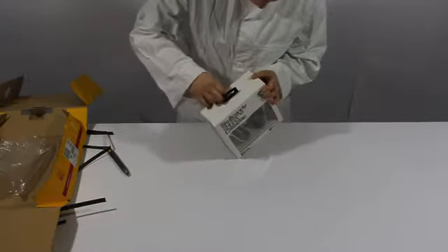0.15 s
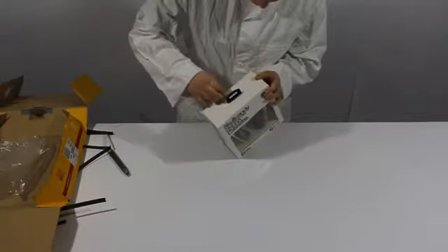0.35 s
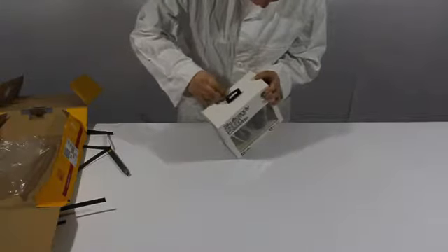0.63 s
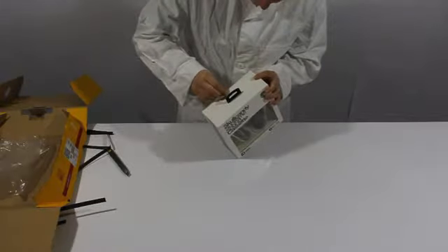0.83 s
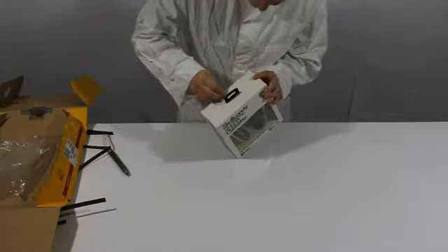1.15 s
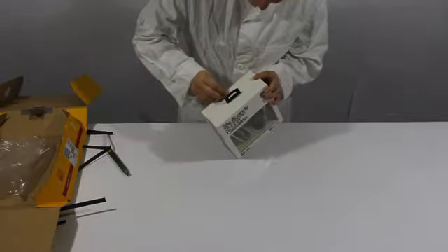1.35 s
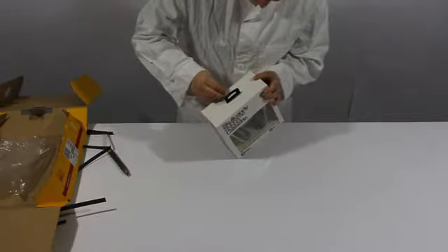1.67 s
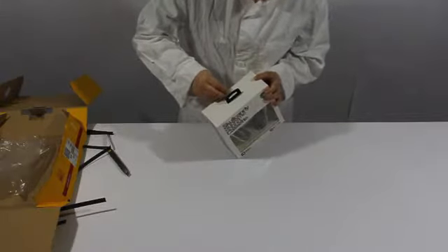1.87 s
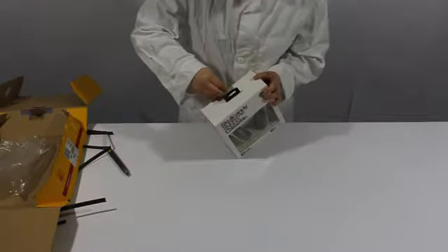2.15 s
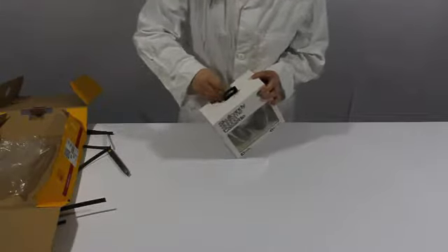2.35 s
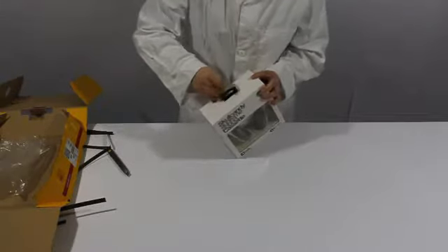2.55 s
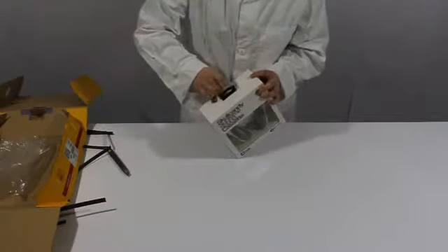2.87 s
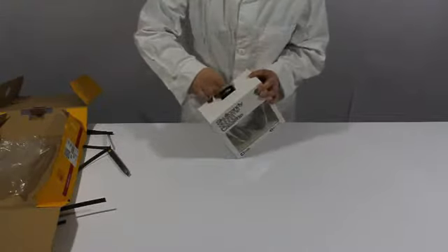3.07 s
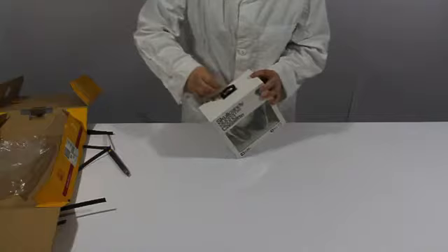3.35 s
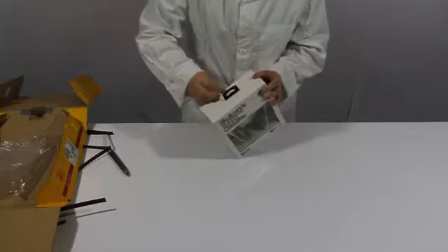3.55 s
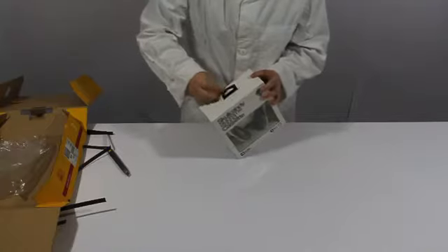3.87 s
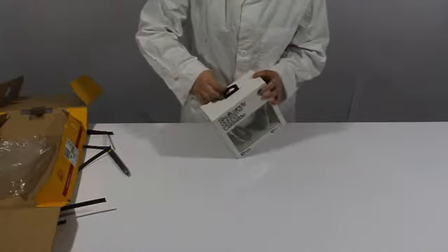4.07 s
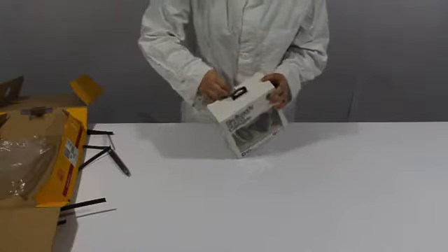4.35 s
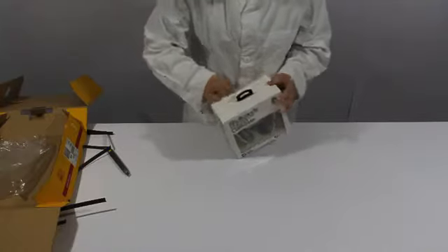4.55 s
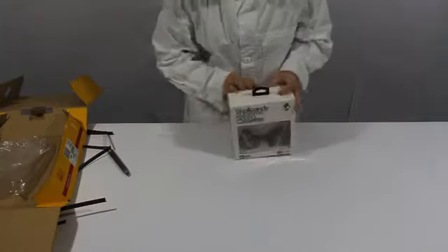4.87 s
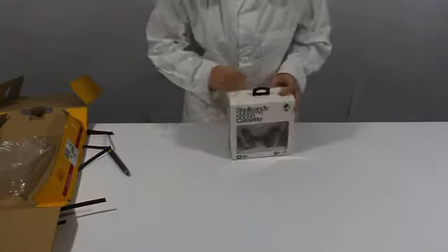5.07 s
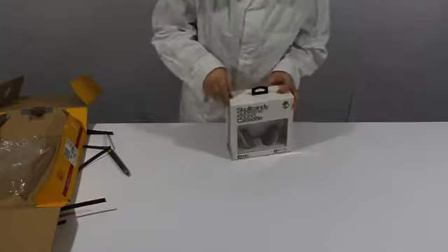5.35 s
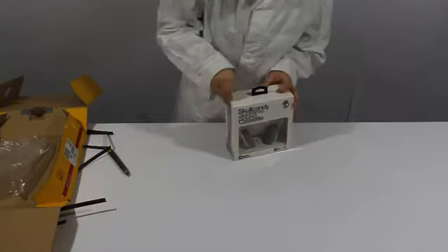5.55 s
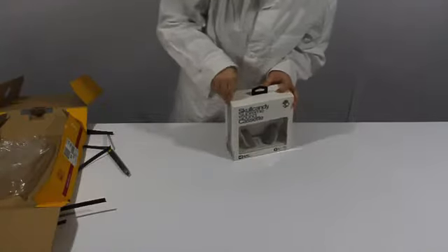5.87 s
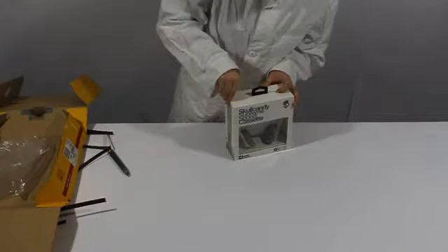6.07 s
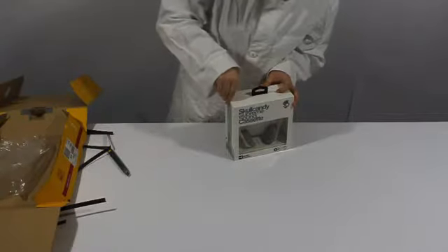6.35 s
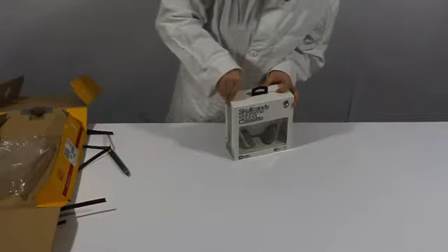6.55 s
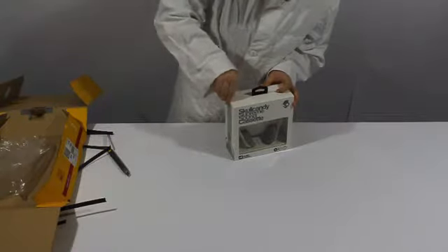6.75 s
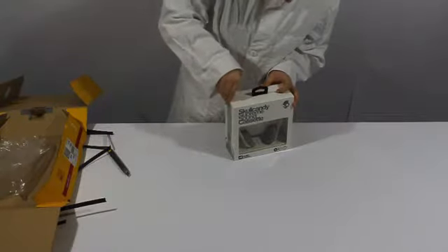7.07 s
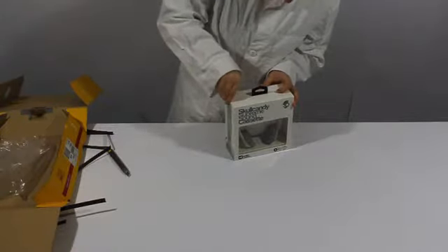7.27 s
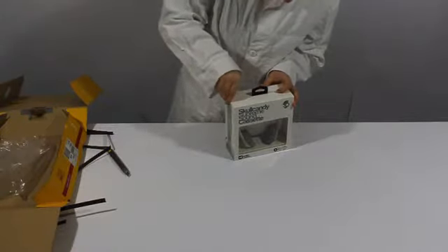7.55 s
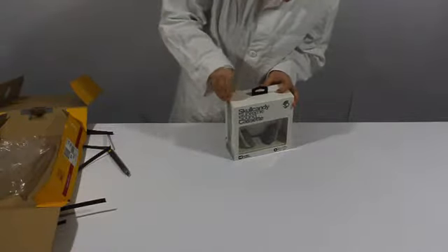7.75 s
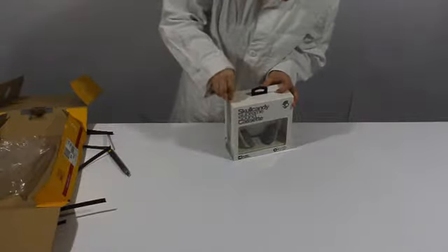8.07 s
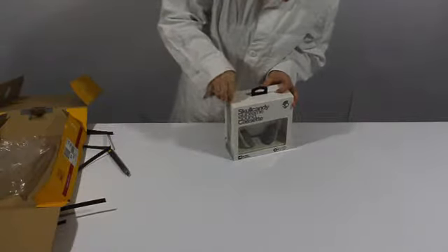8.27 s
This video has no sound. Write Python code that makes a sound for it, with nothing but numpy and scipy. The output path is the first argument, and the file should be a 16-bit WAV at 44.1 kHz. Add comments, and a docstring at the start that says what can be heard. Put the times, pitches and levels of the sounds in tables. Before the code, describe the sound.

Faint room air, soft hiss and a barely audible wavering hum run throughout a bare room with about a second of echo. Light handling rub and two soft taps come in the first 0.6 s. Hard, crisp snaps of plastic against hollow cardboard strike at 1.0, 1.5 and 2.0 s, the first two brighter, the third duller. Small ticks and faint scratches lead to a weaker, very bright snap at 3.2 s. From 3.9 s hands rub the card; a tiny squeak falls in pitch around 4.2 to 4.4 s, ending in another strong snap. Between 4.75 and 5.05 s the box rocks upright with clustered taps, ticks and soft table booms, then shuffles and is nudged at 5.5 s. Hollow knocks come at 6.1 and 6.3 s, the loudest snap at 6.6 s, a dull thud at 7.2 s, and weaker taps at 7.6 and 7.9 s before the echo fades by 8.4 s.

```python
"""Fingernails slip off the plastic seals of a small cardboard box: each edge snaps back and rings wall, flap and card.
Between snaps come light ticks, dull taps, scratches, rubbing and one thin falling squeak of peeling glue.
Midway the box is turned upright, rocks down on the table and is nudged across it.
Blows and friction drive banks of resonances; a bare, echoing room answers over faint air, hum and hiss."""
import sys
import numpy as np
from scipy import signal
from scipy.fft import rfft, irfft
from scipy.io import wavfile

SR = 44100
rng = np.random.default_rng(int(sys.argv[2]) if len(sys.argv) > 2 else 0)


def transcribe(signal):
    """Save signal, clipped to [-1, 1], as a 16-bit WAV file at the path in sys.argv[1]."""
    frames = np.atleast_2d(signal).T
    limited = np.clip(frames, -1, 1)
    pcm = np.round(limited * 32767).astype(np.int16)
    wavfile.write(sys.argv[1], SR, pcm)


N = 371322
HIT_SAMPLES = 4096


def from_db(db):
    """Amplitude ratio of a level in dB."""
    return 10 ** (np.asarray(db) / 20)


def rms_one(x):
    """Scales a sound to an RMS of 1."""
    return x / np.sqrt(np.mean(x ** 2) + 1e-20)


def in_time(rows):
    """The columns of a curve, sample by sample."""
    s, *columns = np.transpose(rows)
    return [np.interp(np.arange(N) / SR, s, column) for column in columns]


def at_hz(points, hz):
    """Reads a spectrum on a log-frequency axis."""
    known_hz, values = np.transpose(points)
    return np.interp(np.log(np.maximum(hz, 1)), np.log(known_hz), values)


def drift(knots_per_s):
    """Random curve: straight lines between normal knots of spread 1."""
    knots = rng.standard_normal(4096)
    return np.interp(np.arange(N) / SR * knots_per_s, np.arange(len(knots)), knots)


def strokes(rows, edge_s):
    """Gain that rises, holds and falls for each (start s, length s, level dB)."""
    t = np.arange(N) / SR
    gain = 0
    for start, length, db in rows:
        to_nearest_end = np.minimum(t - start, start + length - t)
        gain = gain + from_db(db) * np.clip(to_nearest_end / edge_s + .5, 0, 1)
    return gain


def filtered(x, cutoff_hz, kind="low"):
    """Second-order Butterworth filter."""
    return signal.sosfilt(signal.butter(2, cutoff_hz, kind, fs=SR, output="sos"), x)


def sine(hz):
    """Sine that follows a pitch curve."""
    return np.sin(2 * np.pi * np.cumsum(hz) / SR)


def resonate(force, modes):
    """A force through parallel resonances, each (Hz, width Hz, dB)."""
    out = 0
    for hz, width, db in modes:
        r = np.exp(-np.pi * width / SR)
        poles = [1, -2 * r * np.cos(2 * np.pi * hz / SR), r * r]
        zeros = [(1 - r * r) / 2, 0, (r * r - 1) / 2]
        out = out + from_db(db) * signal.lfilter(zeros, poles, force + 1e-18)
    return out


def strike(force, modes, db):
    """The ring of one blow; dB is its energy spread over 10 ms."""
    ring = resonate(force, modes)
    return from_db(db) * ring * np.sqrt(.01 * SR / np.sum(ring ** 2))


def slip(catch_s, count=4):
    """Force of a nail letting go: tiny catches smear one pulse in time but leave its spectrum flat."""
    force = signal.unit_impulse(HIT_SAMPLES)
    for k, chance in enumerate(rng.uniform(.7, 1.3, count)):
        lag = max(round(chance * catch_s * SR / 2 ** k), 1)
        allpass = np.r_[1, np.zeros(lag - 1), .65 * (-1) ** k]
        force = signal.lfilter(allpass[::-1], allpass, force)
    return force


def friction(slips_per_s, uneven_db):
    """Dense small slips of random size, made stronger and weaker by the changing pressure."""
    slips = (rng.random(N) < slips_per_s / SR) * rng.standard_normal(N)
    return slips * from_db(uneven_db * np.tanh(drift(knots_per_s=90)))


def add(track, s, sound):
    """Lays a sound into a track at a time."""
    start = max(round(s * SR), 0)
    part = track[start:start + len(sound)]
    part += sound[:len(part)]


# Steady air. Each row: frequency in Hz, relative density in dB per Hz.
AIR_SPECTRUM = [(25, -24), (60, -14.5), (100, -8), (200, -9.5), (330, -11.5), (460, -9.5), (750, -14.5),
                (1200, -12), (2000, -20.5), (4000, -21.5), (8000, -25), (16000, -29)]
# Hum pitch. Each row: time in seconds, pitch in Hz.
HUM_PITCH = [(0, 151.8), (3.7, 150), (4.15, 141.3), (4.7, 140), (5.3, 158), (6.55, 152.2), (7.15, 165),
             (7.65, 163.8), (8.4, 155.7)]
# Hum swells, before the waver. Each row: start in seconds, length in seconds, added level in dB.
HUM_SWELLS = [(4.05, .55, -62), (6.48, .14, -65), (7.08, .3, -66), (7.58, .14, -62.5), (8.24, .2, -62.5)]
# Mid hiss: a broad band around 1.3 kHz. Each row: time in seconds, level in dB.
MID_HISS = [(0, -62), (3.6, -67.5), (4.2, -62), (8.42, -68)]
AIR_DB, HUM_DB = -56, -72
HUM_WAVERS_PER_S = 7


def background(waver_db=4.5, swell_s=0.11):
    """Room air as shaped noise, a hum that wanders in pitch and level, and a broad band of mid hiss."""
    colour = from_db(at_hz(AIR_SPECTRUM, np.fft.rfftfreq(N, 1 / SR)))
    air = from_db(AIR_DB) * rms_one(irfft(rfft(rng.standard_normal(N)) * colour, N))
    waver = from_db(waver_db * drift(HUM_WAVERS_PER_S))
    hum_gain = (from_db(HUM_DB) + strokes(HUM_SWELLS, swell_s)) * waver
    hum = hum_gain * rms_one(sine(in_time(HUM_PITCH)[0]))
    band = [(1280, 1160, 0)]
    mid_noise = resonate(resonate(rng.standard_normal(N), band), band)
    hiss = from_db(in_time(MID_HISS)[0]) * rms_one(mid_noise)
    return air + hum + hiss


# Room decay. Each row: frequency in Hz, t60 in seconds.
ROOM_T60 = [(100, 0.77), (400, 0.83), (1300, 1.02), (2800, 1.23), (5000, 1.16), (8000, 0.8), (14000, 0.48)]
# Room level. Each row: frequency in Hz, tail energy against the direct sound in dB.
ROOM_DB = [(100, -1), (250, 2), (500, 0), (1200, 2.5), (2800, -2.5), (5000, -4), (8000, -8.5),
           (14000, -7.5)]
# Early echoes from the table and the body. Each row: delay in seconds, gain.
ECHOES = [(.0066, 0.19), (0.0109, 0.041)]


def room(near, around, build_s=0.00067):
    """Direct sound, early echoes and a diffuse tail of noise bands, each with its own level and decay."""
    t = np.arange(2 ** 16) / SR
    hz = np.fft.rfftfreq(len(t), 1 / SR)
    white = rfft(rng.standard_normal(len(t)))
    centres = np.geomspace(80, 16000, 20)
    tail = np.zeros(len(t))
    for centre, share in zip(centres, np.eye(len(centres))):
        weight = at_hz(np.column_stack([centres, share]), hz)
        decay = from_db(-60 * t / at_hz(ROOM_T60, centre)) * (1 - np.exp(-t / build_s))
        band = irfft(white * weight) * decay
        unit_energy = np.sqrt(np.mean(weight ** 2) / np.sum(band ** 2))
        tail += from_db(at_hz(ROOM_DB, centre)) * band * unit_energy
    out = near + signal.fftconvolve(around, tail)[:N]
    for delay, gain in ECHOES:
        add(out, delay, gain * near)
    return out


# Modes of the table top. Each row: frequency in Hz, width in Hz, relative level in dB.
TABLE_MODES = [(68, 16, -27), (108, 6.8, 7), (124.5, 4.7, 7)]


def table_boom(db):
    """The table top booms softly under the box."""
    push = filtered(signal.unit_impulse(2 * HIT_SAMPLES), [70, 400], "band")
    return strike(push, TABLE_MODES, db)


# The bottom edge rocks down on the table. Each row: time in seconds, level in dB.
BUMPS = [(4.878, -48), (4.961, -44), (5.035, -49.5), (5.529, -52)]


def bumps():
    """The box settles on the table, which booms at each contact."""
    out = np.zeros(N)
    for s, db in BUMPS:
        add(out, s, table_boom(db))
    return out


# Thump modes of the whole carton. Each row: frequency in Hz, width in Hz, relative level in dB.
THUMP_MODES = [(214, 360, -11), (251.5, 96, 0.5), (302, 26, 3)]
NUDGE_S, NUDGE_RISE_S, NUDGE_LENGTH_S = 5.52, .04, 0.17
NUDGE_DB, NUDGE_FADE_DB_PER_S = -47.5, -28


def nudge(slips_per_s=1400):
    """A quick push that dies away: the bottom edge judders over the table and drives the whole carton."""
    judder = friction(slips_per_s, uneven_db=0)
    dull = filtered(judder, [120, 500], "band")
    carton = rms_one(resonate(dull, THUMP_MODES + [(207, 26, 0)]))
    fade = from_db(NUDGE_FADE_DB_PER_S * np.maximum(np.arange(N) / SR - NUDGE_S, 0))
    return strokes([(NUDGE_S, NUDGE_LENGTH_S, NUDGE_DB)], NUDGE_RISE_S) * fade * carton


# Modes of the lid flap. Each row: multiple of its pitch, width in Hz, relative level in dB.
FLAP_MODES = [(1.002, 187, 10.5), (1.36, 266, 0), (1.72, 254, 3.5)]


def flap_modes(pitch_hz):
    """The fingers stiffen the flap and so set its pitch."""
    return [(pitch_hz * multiple, width, db) for multiple, width, db in FLAP_MODES]


# Crack modes of the stiff card. Each row: frequency in Hz, width in Hz, relative level in dB.
CARD_MODES = [(2060, 840, 1.5), (2760, 680, 9.5), (3710, 910, 6.5), (4800, 1950, -3)]
# Tick modes of the plastic seal. Each row: frequency in Hz, width in Hz, relative level in dB.
SEAL_MODES = [(6430, 2900, 9.5), (9040, 11000, 10), (11400, 1900, 8.5), (12500, 2000, -5)]


def card_and_seal(grains):
    """Friction heard through flap and card (scratch) and through the plastic (hiss)."""
    scratch = rms_one(resonate(grains, flap_modes(1340) + CARD_MODES))
    hiss = rms_one(resonate(grains, SEAL_MODES))
    return scratch, hiss


# The hands shift and turn the box. Each row: start in seconds, length in seconds, effort in dB.
SHIFTS = [(0.167, 0.19, -13), (3.92, 0.5, -12.5), (4.758, 0.12, -6), (4.864, 0.13, 0), (5.11, 0.276, -9),
          (5.382, 0.1, -9), (5.507, 0.146, -7), (5.73, 0.52, -14.5), (6.93, 0.032, -9),
          (7.544, 0.09, -12.5)]
# Harder rubbing is brighter. Each law: level in dB at full effort, growth in dB per dB of effort.
RUMBLE_LAW, SCRATCH_LAW, HISS_LAW = (-48.5, 1), (-47.5, 1.165), (-50.5, 1.9)


def rubs(edge_s=0.026):
    """The hands drive the whole box with friction; one effort sets rumble, scratch and hiss."""
    effort = strokes(SHIFTS, edge_s)
    carton = THUMP_MODES + [(450, 98, 9.5), (210, 38, -9.0)]
    rumble = rms_one(resonate(friction(slips_per_s=2900, uneven_db=4), carton))
    scratch, hiss = card_and_seal(friction(slips_per_s=1100, uneven_db=1.5))
    out = 0
    for (db, growth), sound in zip((RUMBLE_LAW, SCRATCH_LAW, HISS_LAW), (rumble, scratch, hiss)):
        out = out + from_db(db) * effort ** growth * sound
    return out


# Scratches, one soft wash at 2.22 s that lengthens the room tail of the snap before, and a short
# 1.7 kHz ring that belongs to the snap at 6.629 s. Each row: start in seconds, length in seconds,
# level in dB, hiss against that level in dB before hiss_db, rasp pitch in Hz.
SCRATCHES = [(0.177, .16, -69.5, 9.5, 2190), (2.22, 0.29, -59, -12, 2940), (2.546, 0.081, -54.5, -13, 5170),
             (2.72, 0.043, -59.5, -11, 5200), (3.078, 0.086, -68.5, 12, 6000), (3.671, .012, -49, 1, 2560),
             (3.687, 0.024, -48, -3, 2560), (4.237, 0.18, -67, 13.5, 3700), (4.93, 0.018, -44, 3, 3950),
             (5.005, 0.019, -49, 8.5, 4140), (6.357, 0.039, -49.5, -13, 1800),
             (6.629, 0.023, -37, -15, 1730), (7.471, 0.015, -51, -9, 4100)]
RASP_WIDTH_HZ, RASP_DB = 500, -3


def scratches(edge_s=0.012, hiss_db=-1.0):
    """Friction through card and plastic, too light to move the carton, plus a rasp at each row's pitch."""
    grains = friction(slips_per_s=1500, uneven_db=0.5)
    scratch, hiss = card_and_seal(grains)
    out = 0
    for s, length, db, bright, hz in SCRATCHES:
        rasp = rms_one(resonate(grains, [(hz, RASP_WIDTH_HZ, 0)]))
        sound = scratch + from_db(bright + hiss_db) * hiss + from_db(RASP_DB) * rasp
        out = out + strokes([(s, length, db)], edge_s) * sound
    return out


# The squeak falls as more seal comes free. Each row: time in seconds, centre in Hz, level in dB.
PEEL = [(4.2, 9000, -90), (4.27, 8000, -61), (4.33, 7240, -59), (4.38, 6200, -59), (4.4, 6000, -90)]


def peel(spread_hz=450):
    """Glue lets go in fast, unsteady slips: slow noise times a falling sine."""
    hz, db = in_time(PEEL)
    unsteady = filtered(rng.standard_normal(N), spread_hz)
    return from_db(db) * rms_one(unsteady * sine(hz))


# Light nail ticks that leave the box still. Each row: time in seconds, level in dB before
# crack_db and tick_db, brightness in dB (added to the seal, taken from the card).
TICKS = [(0.577, -54, -10), (0.802, -61.5, -13.5), (1.214, -47.5, 12), (2.194, -47, -2), (3.094, -53, 6),
         (3.355, -56.5, 9.5), (4.751, -46, 3.5), (4.863, -50, 2), (4.89, -40.5, 6), (4.979, -49, 7),
         (5.286, -49.5, -5), (6.372, -43.5, -4), (7.2148, -62, -19), (7.571, -51, -11),
         (7.726, -45.5, -0.5)]


def ticks(crack_db=-7.0, tick_db=-3.5):
    """A nail catches on the edge of the plastic; a bright catch rings more seal and less card."""
    out = np.zeros(N)
    for s, level, bright in TICKS:
        force = slip(catch_s=.0011)
        card = strike(force, CARD_MODES, level - bright + crack_db)
        seal = strike(force, SEAL_MODES, level + bright + tick_db)
        add(out, s, card + seal)
    return out


def with_rebound(sound, gain, delay_s):
    """The plastic edge slaps back once; the sum is scaled to hold the energy roughly steady."""
    lag = max(round(delay_s * rng.uniform(.85, 1.104) * SR), 1)
    slap = np.r_[np.zeros(lag), sound[:-lag]]
    return (sound + gain * slap) / np.hypot(1, gain)


# Modes of the gripped wall. Each row: multiple of its pitch, width in Hz.
WALL_MODES = [(0.996, 66), (1.46, 116)]
# Share of a thump that reaches the table top: box on one corner, then upright.
ON_CORNER_DB, UPRIGHT_DB, UPRIGHT_S = -23, -9.5, 5.0


def blow(s, level, wall_hz, flap_hz, thump, overtone, flap, crack, tick, tilt,
         wall_db=-0.5, crack_db=3.0, tick_db=-2.5, soft_hz=1800):
    """One blow rings box and table; returns sound toward the microphone and sound into the room."""
    force = slip(catch_s=.0003)
    push = filtered(slip(catch_s=.0006), [90, soft_hz], "band")   # heavy parts follow slowly
    low = strike(push, THUMP_MODES, level + thump)
    for (multiple, width), db in zip(WALL_MODES, (level, level + overtone)):
        wall = strike(push, [(wall_hz * multiple, width, 0)], db + wall_db)
        low = wall - low   # neighbours swing in turn
    tilted_seal = [(hz, width, db + tilt * np.log2(hz / SEAL_MODES[0][0])) for hz, width, db in SEAL_MODES]
    high = strike(force, flap_modes(flap_hz), level + flap)
    high = high + strike(force, CARD_MODES, level + crack + crack_db)
    high = high + strike(force, tilted_seal, level + tick + tick_db)
    boom = table_boom(level + thump + (UPRIGHT_DB if s > UPRIGHT_S else ON_CORNER_DB))
    near, around = np.zeros((2, N))
    add(near, s, low + with_rebound(high, gain=0.33, delay_s=0.000881))
    add(around, s, low + high)
    add(near, s, boom)
    add(around, s, boom)
    return np.stack([near, around])


# Fingers and table knock dully on the box. Each row: time in seconds, level in dB before blow's trims,
# nominal wall pitch in Hz, thump against that level in dB, sharpness in dB.
TAPS = [(0.332, -49, 516, -3.5, -17), (0.576, -44, 447, -9.5, -10), (4.824, -41, 479, -22, -24),
        (4.864, -46, 690, -11, -12), (5.0095, -35, 655, -24, -4), (5.022, -38.5, 497, -20, -32),
        (5.755, -46.5, 447, -8, -26), (6.0615, -31.5, 488, -6.5, -17), (6.279, -35, 461, -25, -9),
        (7.221, -26.5, 459, -11, -42), (7.557, -38.5, 468, -25, -36), (7.921, -45, 443, -25, -24)]
TAP_FLAP_HZ, TAP_FLAP_DB, TAP_OVERTONE_DB = 853, -9.5, -11
TAP_CRACK_DB, TAP_CRACK_PER_DB = -6.5, 0.78


def taps():
    """Duller blows: the sharper the contact, the more card and plastic join in."""
    out = 0
    for s, level, wall_hz, thump, sharp in TAPS:
        crack = TAP_CRACK_DB + TAP_CRACK_PER_DB * sharp
        out = out + blow(s, level, wall_hz, TAP_FLAP_HZ, thump, TAP_OVERTONE_DB, TAP_FLAP_DB,
                         crack, tick=sharp, tilt=-7.0)
    return out


# A seal snaps back. Each row: time in seconds, level in dB, nominal wall pitch in Hz, nominal flap pitch in Hz,
# then against that level, before blow's trims: thump in dB, wall overtone in dB, flap in dB,
# crack in dB, tick in dB; last the tick tilt in dB per octave.
SNAPS = [(1.0183, -24, 436, 1330, -6.5, -13.5, -2, 0.5, 5, -4),
         (1.4821, -25.5, 435, 1350, -4, -9, -12, 2, 8.5, -10),
         (2.04, -24.5, 500, 913, -3.5, -7.5, -3, -5.5, -12, 0),
         (3.192, -29, 417, 1310, -8, -34, -9.5, -11.5, 1.5, 29),
         (4.3896, -23.5, 510, 990, -13.5, -3.5, -5.5, -6.5, 0.5, 4),
         (6.629, -21, 477, 890, -13, -13.5, -5.5, -8, -11, 3)]


def snaps():
    """The nail slips off a seal and its edge whips back against the card."""
    return sum(blow(*row) for row in SNAPS)


def scene():
    """All sources in the room, over the background; the same signal in both channels."""
    # mono sources go equally toward the microphone and into the room
    near, around = nudge() + bumps() + rubs() + scratches() + peel() + ticks() + taps() + snaps()
    mono = room(near, around) + background()
    return np.stack([mono, mono])


CUTOFF_HZ = 16000


def record(dry, top=2.4):
    """The hardest snaps overload the input, which rounds the peaks; a steep low-pass cuts the top."""
    rounded = top * np.tanh(dry / top)
    return signal.sosfilt(signal.ellip(10, .1, 80, CUTOFF_HZ, fs=SR, output="sos"), rounded)


dry = scene()
out = record(dry)
transcribe(out)
```